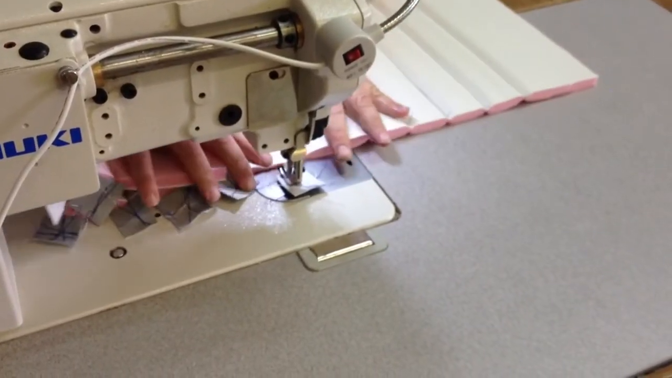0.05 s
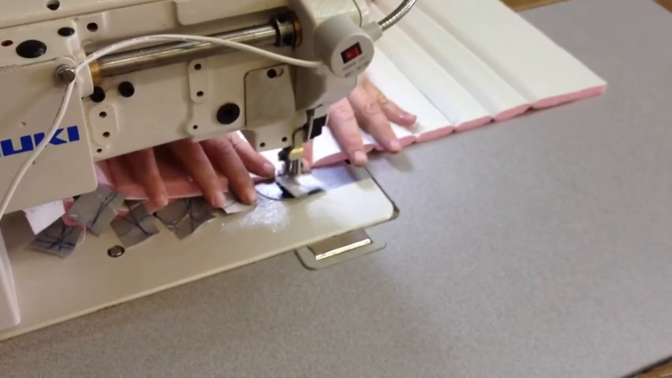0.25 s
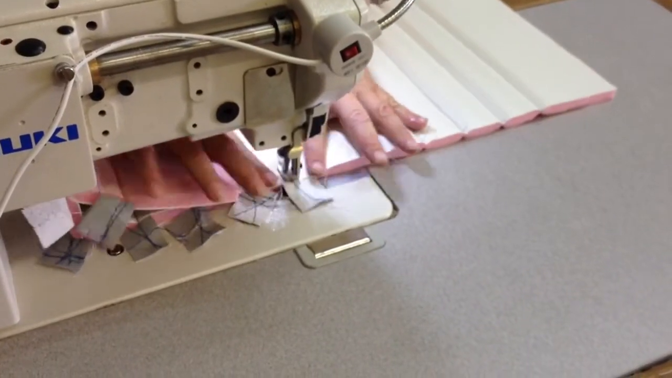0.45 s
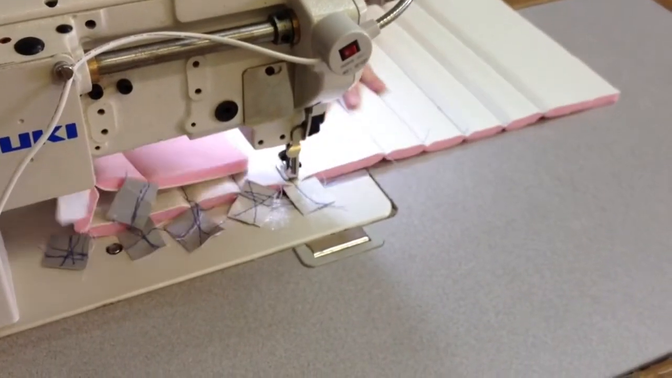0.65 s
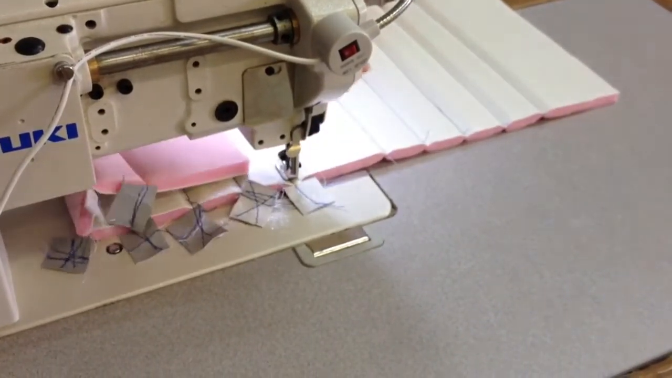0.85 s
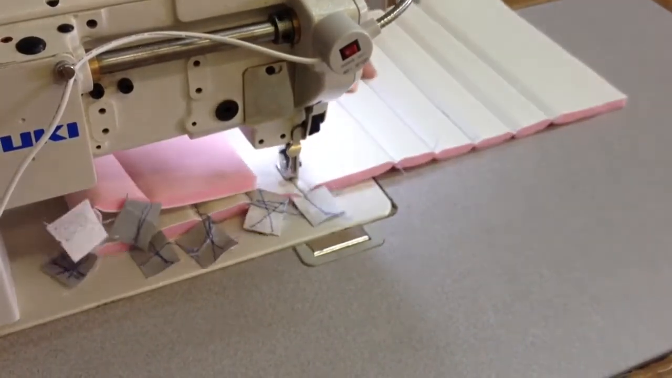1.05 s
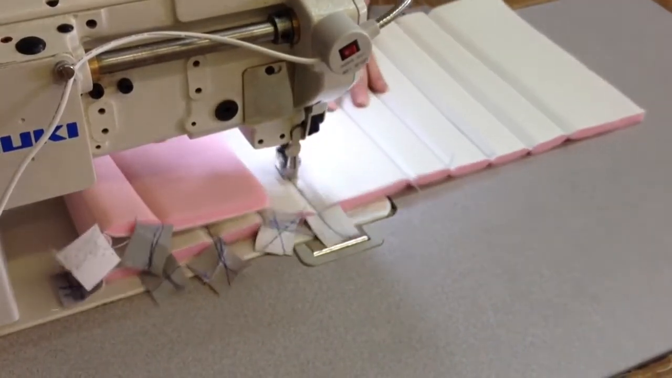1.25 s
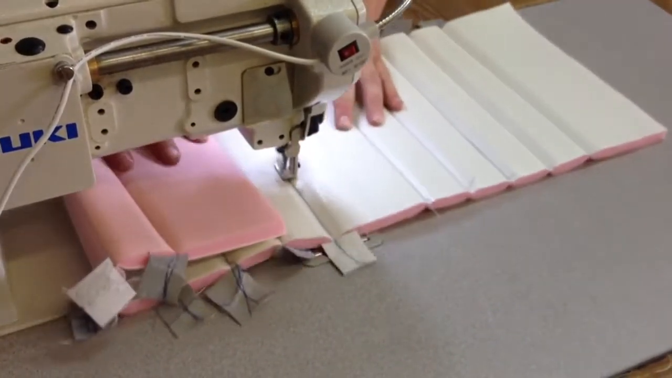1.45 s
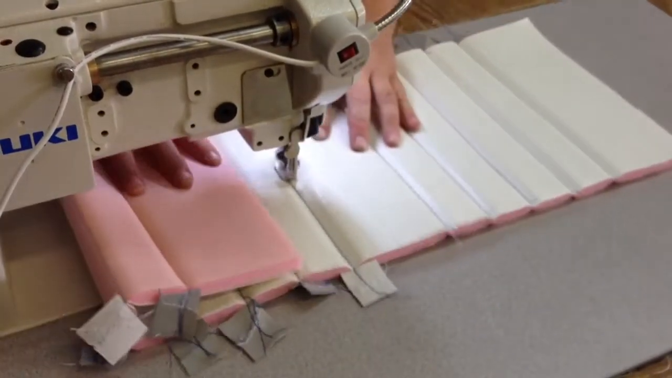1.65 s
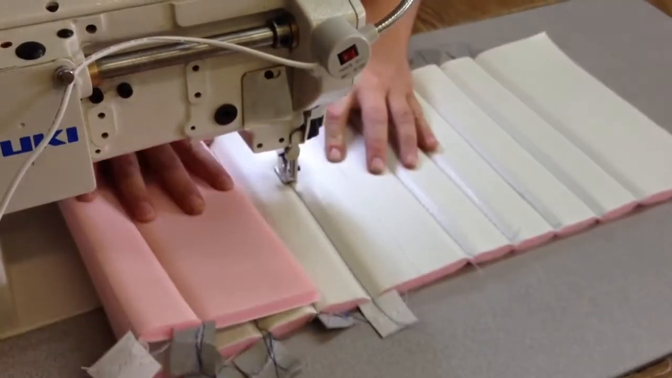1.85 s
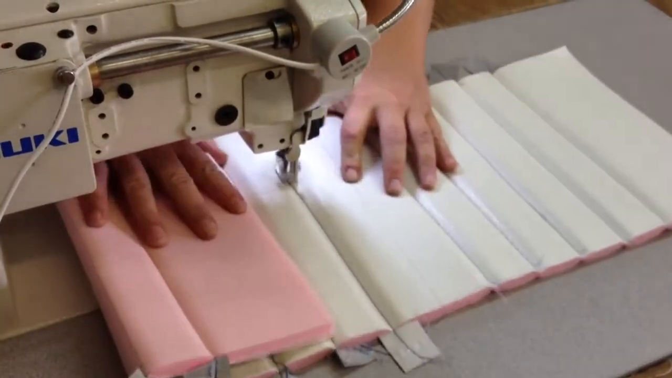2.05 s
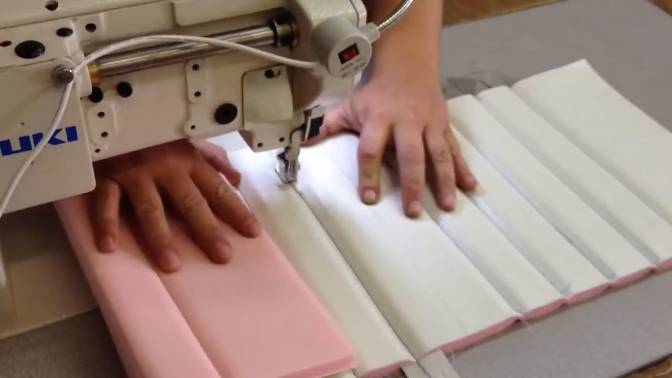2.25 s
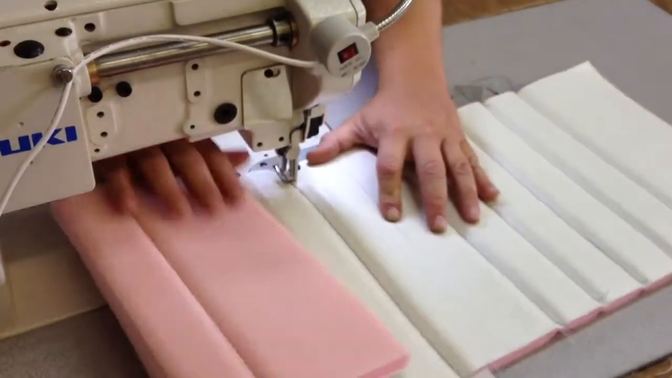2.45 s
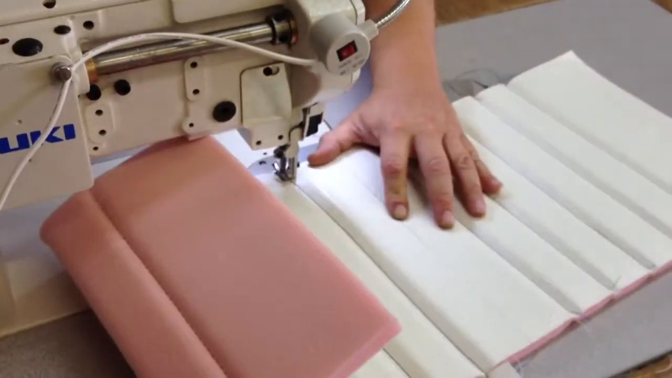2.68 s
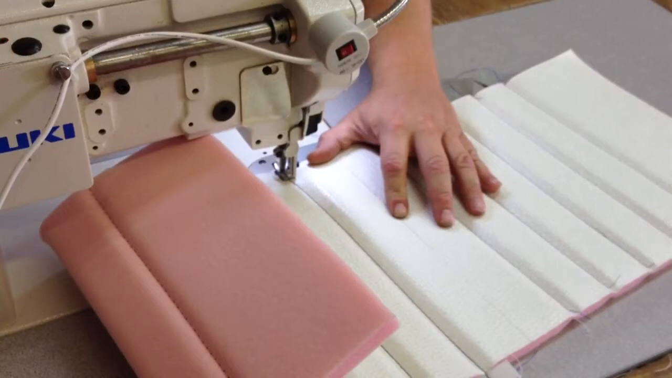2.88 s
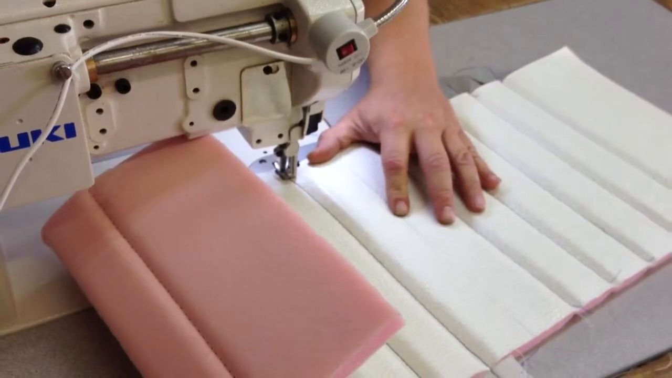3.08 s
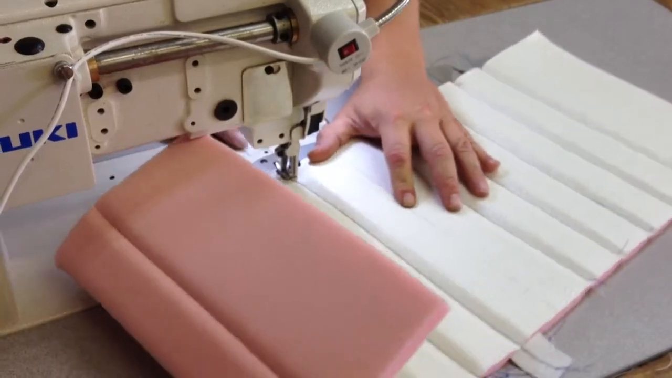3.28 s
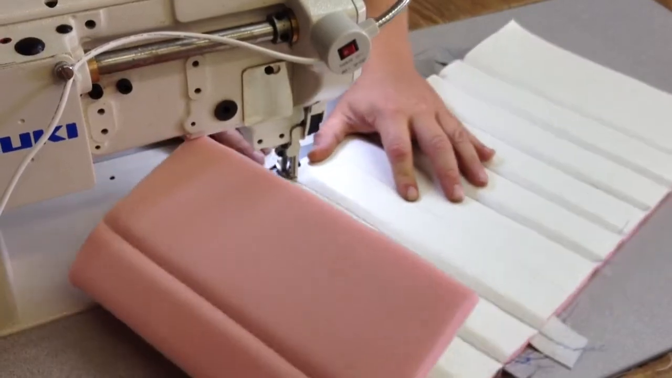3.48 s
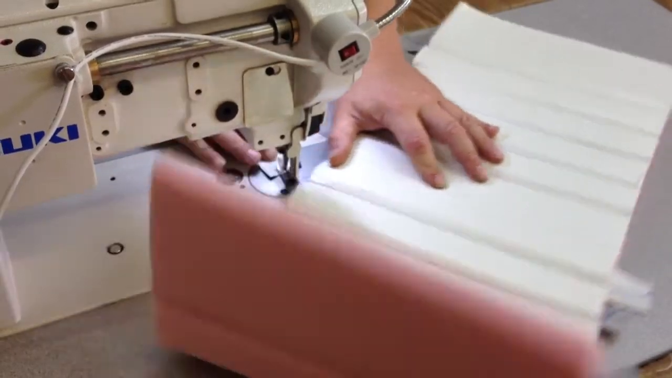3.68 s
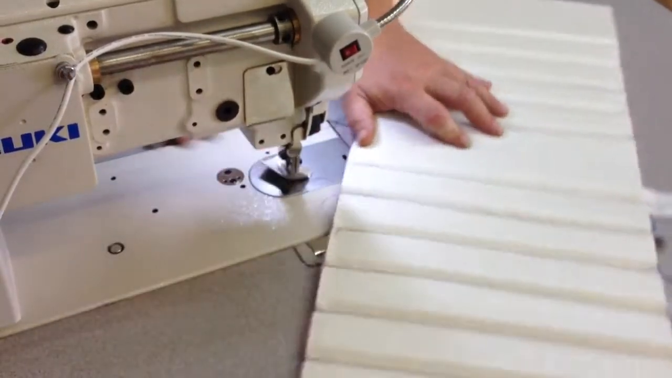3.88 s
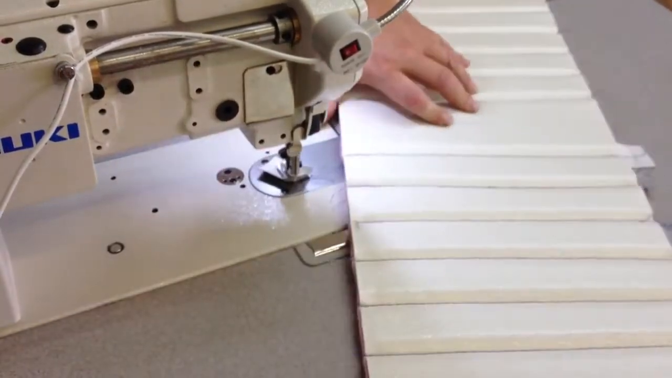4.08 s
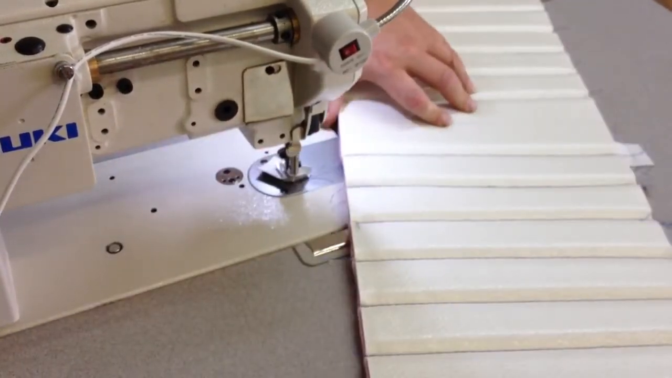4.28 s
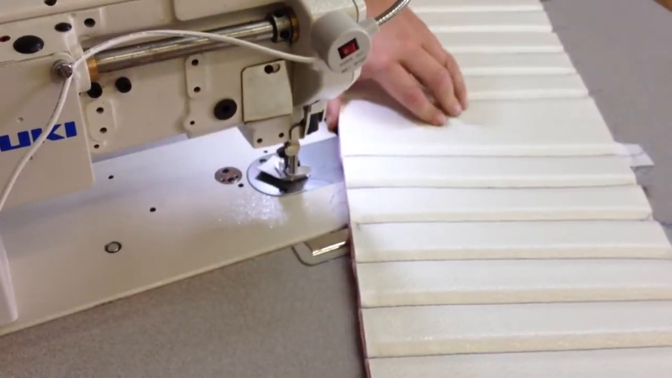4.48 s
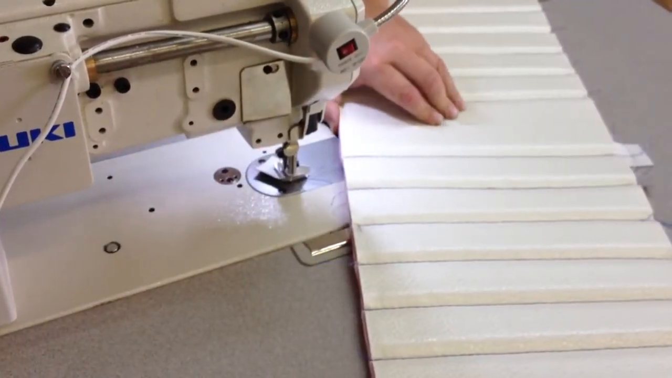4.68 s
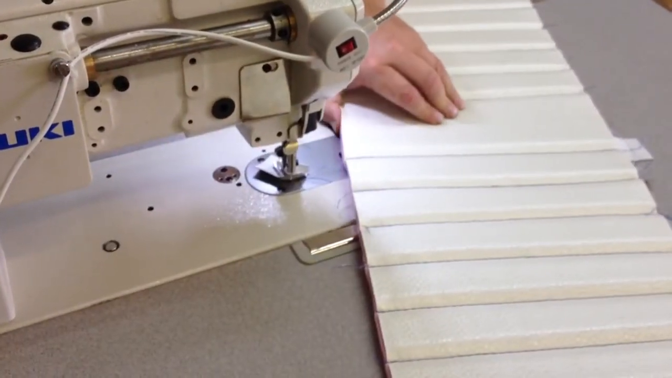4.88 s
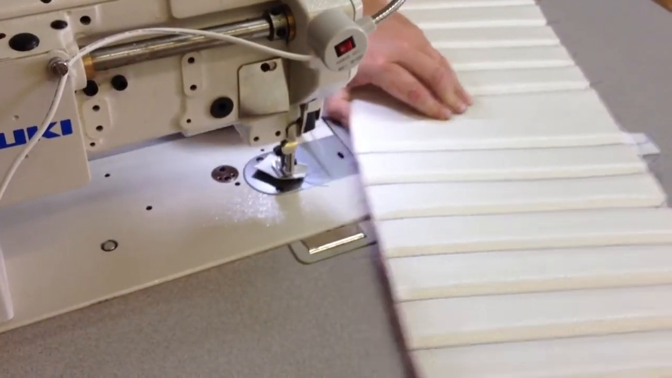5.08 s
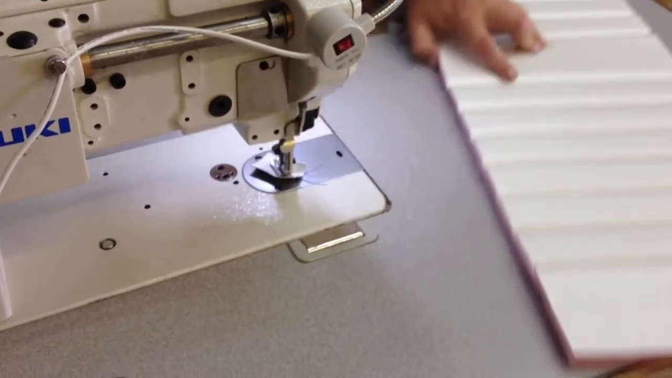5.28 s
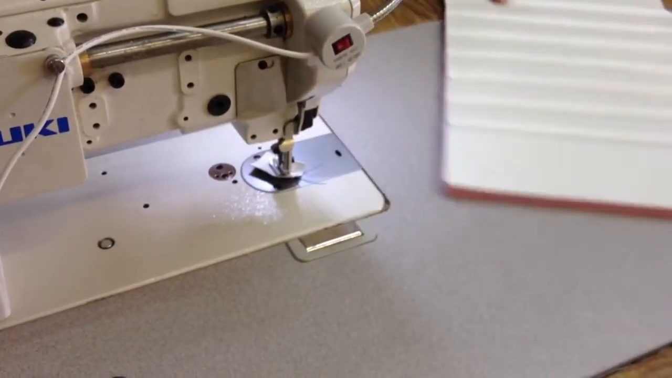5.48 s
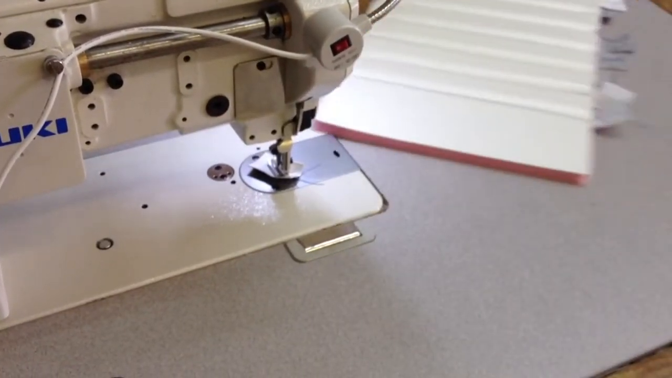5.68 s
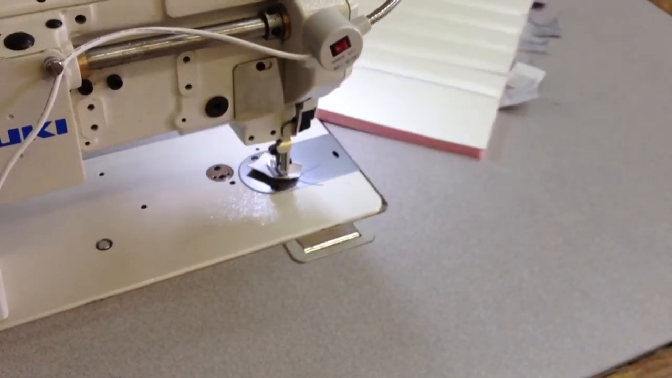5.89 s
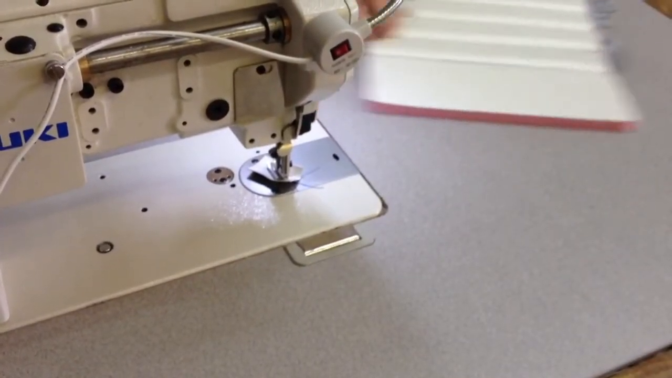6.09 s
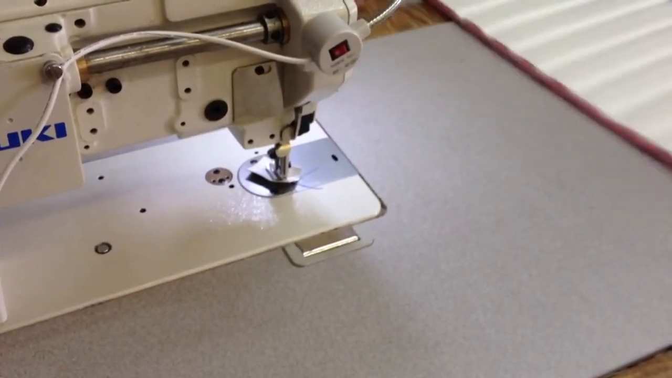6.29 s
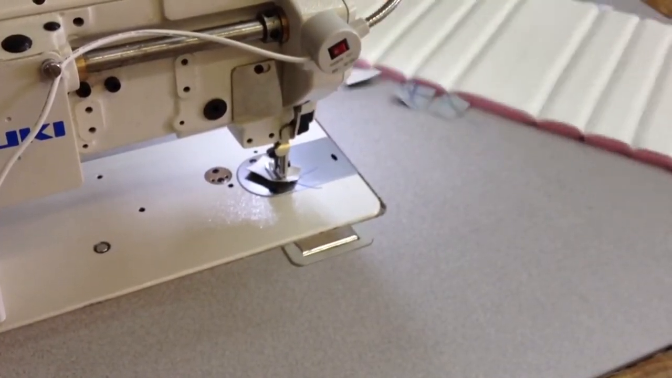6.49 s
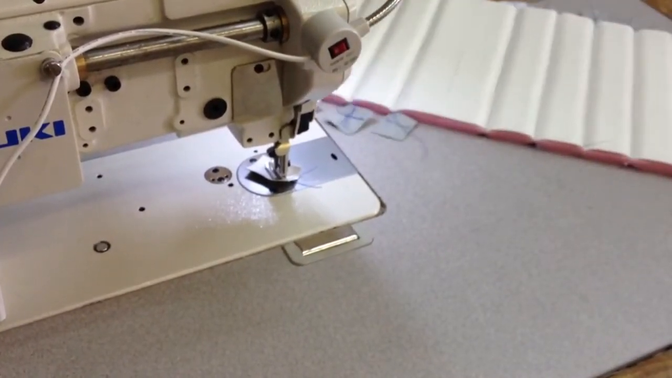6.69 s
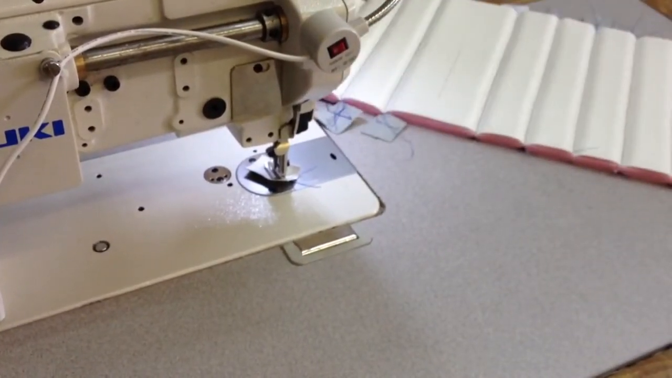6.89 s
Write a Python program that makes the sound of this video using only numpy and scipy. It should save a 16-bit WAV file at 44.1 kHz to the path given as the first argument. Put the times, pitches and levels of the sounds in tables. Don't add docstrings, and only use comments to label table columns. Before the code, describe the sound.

A heavy sewing machine heard from close by, with slight room echo: a brief rattling burst, then about a second and a half of rapid even clatter and throbbing low drone, braking quickly. Padded panels brush the table, levers click, and a last short burst rattles. Afterwards only soft air hum, small ticks, a thread snip, a hard tap and light foam rubbing remain.

```python
import sys
import numpy as np
from scipy import signal
from scipy.fft import rfft, irfft, next_fast_len
from scipy.io import wavfile
from scipy.ndimage import uniform_filter1d

SR = 44100
rng = np.random.default_rng(int(sys.argv[2]) if len(sys.argv) > 2 else 0)


def gain_from_decibels(decibels):
    exponent = np.asarray(decibels, float) / 20
    return 10 ** exponent


def materialize(psi):
    bounded = np.clip(np.atleast_2d(psi).T, -1, 1)
    quanta = np.round(bounded * 32767).astype(np.int16)
    wavfile.write(sys.argv[1], SR, quanta)


N = 306054
TIME_S = np.arange(N) / SR
FEED_ANGLE = 0.525
CRUISE_SPEED = 27.05


def level_curve(tables):
    curve = 0
    for table in tables:
        s, db = np.transpose(table)
        curve = curve + gain_from_decibels(np.interp(TIME_S, s, db, left=-150, right=-150))
    return curve


def coloured(spectrum):
    hz, db = np.transpose(spectrum)
    size = next_fast_len(N)
    grid = np.maximum(np.arange(size // 2 + 1) * SR / size, 1)
    gain = gain_from_decibels(np.interp(np.log(grid), np.log(hz), db))
    noise = irfft(rfft(rng.standard_normal(size)) * gain, size)[:N]
    return noise / np.sqrt(np.mean(noise ** 2) + 1e-20)


def drift(rate):
    knots = rng.standard_normal(int(N / SR * 100) + 2)
    return np.interp(TIME_S * rate, np.arange(len(knots)), knots)


def ring(clicks, hz, t60):
    r, w = gain_from_decibels(-60 / (t60 * SR)), 2 * np.pi * hz / SR
    return signal.lfilter([0, np.sin(w)], [1, -2 * r * np.cos(w), r * r], clicks + 1e-18)


def room(x):
    t60_s, tail_db = 0.4, -10
    t = np.arange(SR // 2) / SR
    tail = rng.standard_normal(len(t)) * gain_from_decibels(-60 * t / t60_s) * np.minimum(t / .006, 1)
    tail = signal.lfilter([.5], [1, -.45], tail)
    tail /= np.sqrt(np.sum(tail ** 2))
    return x + gain_from_decibels(tail_db) * signal.fftconvolve(x, tail)[:N]


def radiated(x):
    return signal.sosfilt(signal.butter(6, 125, "high", fs=SR, output="sos"), x)


# (time [s], level [dB])
AIR_LEVEL = [(0, -46), (.2, -45), (2.9, -46), (4.8, -46.5), (5.3, -45.5), (7, -46)]
# (frequency [Hz], level [dB per Hz])
AIR_COLOUR = [(20, -64), (50, -41), (90, -22.5), (125, -8), (200, -3.5), (265, -6), (400, -3), (620, -13.5),
              (1020, -10), (2500, -16), (3500, -27), (4800, -24), (10000, -35), (15500, -40.5)]


def workshop_air():
    return level_curve([AIR_LEVEL]) * gain_from_decibels(2.5) * coloured(AIR_COLOUR)


# (frequency [Hz], rms level [dB])
HUM_TONES = [(129.2, -55), (263.8, -49.5), (323.0, -55), (360.7, -57)]


def hum():
    out = np.zeros(N)
    for hz, db in HUM_TONES:
        level = gain_from_decibels(db + 1.5 + 2.0 * drift(2.81))
        out += level * np.sin(2 * np.pi * hz * TIME_S + 2.0 * drift(5))
    return out


# (time of hardest push [s], level [dB], rise [s], fade [s])
FOAM_PUSHES = [(.17, -39.5, .04, 0.18), (.65, -42, 0.19, 0.26), (.85, -58, 0.039, .1),
               (3.12, -46.5, 0.19, 0.32), (3.51, -47.5, 0.089, 0.82), (4.0, -63, .1, .2),
               (4.75, -59, 0.2, 0.89), (5.13, -53, 0.16, 1), (5.62, -46, 0.071, .1),
               (6.1, -59.5, 0.27, 0.89), (6.4, -48.5, .6, 0.57)]
# (frequency [Hz], level [dB per Hz])
FOAM_COLOUR = [(1470, -0.5), (2500, 4), (3720, -15), (4750, 0.5), (5200, -8), (6200, -3), (10300, -13),
               (12800, -10), (15500, -21)]


def foam_sliding():
    push = np.zeros(N)
    for s, db, rise, fade in FOAM_PUSHES:
        distance = np.maximum((s - TIME_S) / rise, (TIME_S - s) / fade)
        push += gain_from_decibels(db - 20 * distance)
    return radiated(push * gain_from_decibels(0.66 * drift(32)) * coloured(FOAM_COLOUR))


# (time [s], peak level [dB], frequency [Hz], t60 [s])
TABLE_KNOCKS = [(0.155, -24, 214, 0.14), (0.283, -8.5, 212, 0.23), (0.321, -16, 242, 0.23),
                (0.35, -20, 183, 0.14), (0.998, -14, 208, .1), (1.029, -7, 363, 0.09),
                (0.893, -12, 252, 0.032), (0.961, -12, 232, 0.086), (3.656, -14.5, 240, 0.073),
                (3.705, -9, 229, 0.11), (3.742, -15, 220.5, 0.12), (3.768, -8, 231, 0.13),
                (4.177, -24, 218, 0.095), (4.978, -18, 187, 0.027), (5.593, -19, 256, 0.048),
                (5.949, -28, 260.5, 0.5)]


def knocks():
    out = np.zeros(N)
    click = np.zeros(SR // 4)
    click[0] = 1
    blow = signal.lfilter([.02], [1, -.98], click) * 0.7
    for s, db, hz, t60 in TABLE_KNOCKS:
        i = round(s * SR)
        out[i:i + len(blow)] += gain_from_decibels(db) * ring(blow, hz, t60)
    return out


# (time [s], peak level [dB], centre frequency [Hz], t60 [s])
LEVER_TICKS = [(0.167, -32, 5070, 0.073), (.226, -37, 8040, .021), (.245, -31, 7200, .021),
               (.298, -32, 6500, 0.024), (0.331, -20, 6500, .016), (.843, -33, 6060, .031),
               (.968, -15.5, 1990, 0.027), (.989, -22, 5500, .016), (3.456, -45, 2000, .021),
               (3.498, -34.5, 9900, 0.16), (3.618, -36, 5500, .021), (3.692, -23.5, 6300, 0.02),
               (3.706, -22, 2400, 0.026), (3.979, -28, 6960, 0.018), (4.181, -26, 1730, 0.026),
               (4.182, -40, 6000, .021), (4.204, -36, 2050, 0.019)]
# (time [s], peak level [dB], centre frequency [Hz], t60 [s])
HANDLING_TICKS = [(5.006, -38, 11000, .041), (5.0733, -26, 7900, 0.013), (5.076, -26, 7500, 0.027),
                  (5.5785, -30, 2500, .016), (5.5822, -15.5, 4100, 0.02), (5.582, -20.5, 2050, 0.024),
                  (5.594, -12, 4830, 0.0076), (5.593, -24.5, 5960, 0.081), (5.598, -18.5, 1500, 0.049),
                  (5.612, -27, 1200, .14), (5.692, -36, 7500, .015), (5.693, -29, 2300, .021),
                  (5.761, -34, 3160, 0.015), (5.943, -32, 1300, 0.15), (6.289, -31.5, 1300, 0.22),
                  (6.3126, -33, 1680, 0.17), (6.451, -37, 5500, .021), (6.63, -33, 5440, .021)]


def ticks():
    out = np.zeros(N)
    t = np.arange(SR // 8) / SR
    for s, db, hz, t60 in LEVER_TICKS + HANDLING_TICKS:
        i = round(s * SR)
        edges = [hz / 1.6, min(hz * 1.6, SR / 2.5)]
        band = signal.butter(2, edges, "band", fs=SR, output="sos")
        burst = signal.sosfilt(band, rng.standard_normal(len(t)) * gain_from_decibels(-60 * t / t60))
        out[i:i + len(t)] += gain_from_decibels(db - 2.0) * burst / np.abs(burst).max()
    return out


# (time [s], length [s], frequency [Hz], level [dB])
PEDAL_SQUEAKS = [
    (.18, .06, 1390, -42),
    (3.6, .08, 1600, -47),
]


def pedal():
    out = np.zeros(N)
    for s, length, hz, db in PEDAL_SQUEAKS:
        swell = np.sin(np.pi * np.clip((TIME_S - s) / length, 0, 1))
        out += gain_from_decibels(db) * swell * np.sin(2 * np.pi * hz * TIME_S)
    return out


# (time [s], level below full [dB])
DRIVE_EFFORT = [
    [(0.23, -26), (0.274, -17.5), (0.3, -11), (0.36, -3), (0.434, 0), (0.47, -4.5), (0.566, -19),
     (0.622, -34), (0.67, -25)],
    [(0.81, -30), (0.9, -20), (0.96, -13.5), (1.04, -2.5), (1.2, 0.5), (2.4, 1), (2.49, 2.5), (2.57, -11),
     (2.77, -35.5)],
    [(3.61, -28), (3.68, -24), (3.714, -5), (3.73, -9), (3.776, 1), (3.854, -0.3), (3.9, -5), (3.976, -18),
     (4.09, -33)],
]


def drive_effort():
    return level_curve(DRIVE_EFFORT)


# (time [s], speed [turns per s])
SHAFT_SPEED = [(1.0478, 21.99), (1.11, 26.27), (1.19, 28.02), (1.33, 28.92), (1.44, 28.65), (1.55, 27.08),
               (1.72, 26.8), (1.95, 27.05), (2.48, 27.15)]
# (speed [turns per s], needle level [dB], feed level [dB])
CLACK_LEVELS = [(22, -18, -10), (27.34, -12, -17), (28.5, -13.5, -5.5)]


def seam_clacks():
    stitches = 39
    s, speed = np.transpose(SHAFT_SPEED)
    t = np.arange(s[0], s[-1] + .02, 1 / SR)
    speed = np.interp(t, s, speed)
    angle = np.append(np.arange(stitches)[:, None] + [0, FEED_ANGLE], stitches)
    times = np.interp(angle, np.cumsum(speed) / SR, t)
    now = np.interp(times, t, speed)
    law_speed, needle_db, feed_db = np.transpose(CLACK_LEVELS)
    needle = np.interp(now, law_speed, needle_db)
    feed = np.interp(now, law_speed, feed_db)
    return list(zip(times, np.where(angle % 1 == 0, needle, feed)))


# (time [s], peak level [dB])
FIRST_CLACKS = [(0.2818, -22.5), (0.3177, -19.5), (0.3478, -17.5), (0.3703, -18.5), (0.3933, -13.5),
                (0.4128, -16), (0.4329, -11), (0.4558, -12.5), (0.4884, -32), (0.526, -30)]
# (time [s], peak level [dB])
STARTING_CLACKS = [(0.9058, -25), (0.9383, -29), (0.967, -24), (0.998, -20.5), (1.0255, -17.5)]
# (time [s], peak level [dB])
BRAKING_CLACKS = [(2.502, -8.5), (2.53, -17)]
# (time [s], peak level [dB])
LAST_CLACKS = [(3.7428, -12), (3.7679, -12), (3.794, -6), (3.8145, -10), (3.835, -7.5), (3.8569, -8),
               (3.888, -23)]


def shaft():
    times, turns, levels = [], [], []
    seam = STARTING_CLACKS + seam_clacks() + BRAKING_CLACKS
    for k, burst in enumerate([FIRST_CLACKS, seam, LAST_CLACKS]):
        s, db = np.transpose(burst)
        half = np.arange(len(s))
        angle = np.where(half % 2 == 0, half // 2 - 1 + FEED_ANGLE, half // 2)
        angle = angle + 100 * k
        times += [s[0] - .055, *s, s[-1] + 0.17]
        turns += [angle[0] - .42, *angle, angle[-1] + 1.35]
        levels += [db[0] - 50, *db, db[-1] - 42]
    return np.array(times), np.array(turns), np.array(levels)


# (frequency [Hz], level [dB per Hz])
SHAKE_COLOUR = [(20, -60), (90, -44), (130, -2), (200, 3.5), (350, -1), (600, -13.5), (1200, -15),
                (1700, -19), (2500, -21.5), (3300, -51), (5000, -55)]


def shaking(bed, tonal):
    return gain_from_decibels(-17 + 13 * (1 - tonal)) * bed * coloured(SHAKE_COLOUR)


# (frequency [Hz], level [dB per Hz])
RATTLE_COLOUR = [(2800, -34), (3300, 0), (3800, -6), (4350, 2.5), (5500, 2.5), (6600, 2.5), (7400, -1),
                 (8500, 0), (10400, -8), (12500, -0.5), (14400, -11.5), (15500, 0)]


def rattling(effort, turn):
    swell_db = 0.49 * np.cos(4 * np.pi * (turn - .09))
    level = gain_from_decibels(-24) * effort ** 0.91
    return gain_from_decibels(-5.5 + swell_db + 0.5 * drift(56)) * level * coloured(RATTLE_COLOUR)


# (frequency [Hz], level [dB per Hz])
GRIND_COLOUR = [(400, -43), (600, 9.5), (850, 7), (1300, 4), (1700, 10), (2400, -7.5), (3000, -4),
                (3500, -40)]


def grinding(arm):
    return gain_from_decibels(-17) * arm * coloured(GRIND_COLOUR)


def strike(modes, at, strength):
    out = np.zeros(N)
    contacts = at.shape[1]
    for hz, db, t60 in modes:
        grip = rng.choice([-1, 1], contacts) * gain_from_decibels(rng.normal(0, 2.5, contacts))
        change_db = 2.2 * rng.standard_normal(at.shape)
        clicks = np.zeros(N)
        np.add.at(clicks, at, strength * grip * gain_from_decibels(db + change_db))
        out += ring(clicks, hz, t60)
    return out


# (angle [turns], delay [ms], arm level [dB], steel level [dB], looseness [ms])
TURN_CONTACTS = [(0., .4, -1.5, -1.5, .02), (0., 1.3, -6, -5, .1), (0., 2.8, -1.5, -9, .02),
                 (0., 4.2, -5, -5, .05), (.19, 0, -8, -20, .02), (.24, 0, -5, -18, .02),
                 (.31, 0, -11, -18, .03), (.36, 0, -8, -19, .02), (.42, 0, -9, -22, .02),
                 (.47, 0, -14, -19, .05), (FEED_ANGLE, .5, -4, -1.5, .08), (FEED_ANGLE, 1.6, -6, -7, .1),
                 (FEED_ANGLE, 2.8, -4, -15, .03), (.67, 0, -8, -18, .02), (.75, 0, -11, -21, .02),
                 (.83, 0, -9, -21, .02), (.92, 0, -12, -22, .02)]
# (frequency [Hz], level [dB], t60 [s])
ARM_MODES = [(685, -26, 0.025), (775, -13.5, 0.028), (1037, -12.5, 0.021), (1300, -10.5, 0.025),
             (1530, -0.5, 0.0052), (1710, -8, 0.033), (1790, -9, 0.03), (2150, 0.5, 0.01),
             (2300, -4, 0.011), (2390, -1, 0.0087), (2784, -2, 0.0097), (3580, -13, 0.006)]
# (frequency [Hz], level [dB], t60 [s])
STEEL_MODES = [(2440, 3, 0.0076), (4430, -5.5, 0.021), (4780, -0.5, 0.011), (5200, -0.5, 0.006),
               (5660, 4.5, 0.0065), (6300, -3, 0.0049), (6950, 3, 0.0053), (7500, -0.5, 0.0061),
               (9600, -9, 0.0048), (9750, -13, 0.0021), (12200, -25, 0.0036), (12400, -1, 0.0044),
               (14100, -16, .003)]


def contacts(times, turns, levels, effort, arm):
    angle, delay_ms, arm_db, steel_db, loose_ms = np.transpose(TURN_CONTACTS)
    whole = np.unique(np.concatenate([np.floor(turns), np.floor(turns) - 1]))
    s = np.interp(whole[:, None] + angle, turns, times)
    s = s + (delay_ms + loose_ms * rng.standard_normal(s.shape)) / 1000
    at = np.clip(np.round(s * SR).astype(int), 0, N - 1)
    running = effort[at] > 1e-6
    clack_db = np.interp(s, times, levels)
    casting = strike(ARM_MODES, at, arm[at] * gain_from_decibels(arm_db - 3.5))
    steel = strike(STEEL_MODES, at, running * gain_from_decibels(clack_db + steel_db - 8.5))
    return room(casting + steel)


# (frequency [Hz], level [dB])
TABLE_ANSWER = [(100, -24), (135, -6), (146, -15), (165, -5), (205, 3.), (243, 0.), (252, 1.), (260, -8),
                (292, -15), (335, -3), (348, -13), (400, 2.), (462, 0.), (490, -12)]


def table_db(hz):
    table_hz, db = np.transpose(TABLE_ANSWER)
    return np.interp(np.log(hz + 1), np.log(table_hz), db)


# (multiple of shaft speed, level [dB])
BED_TONES = [(1, -46), (2, -45), (3, -44), (4, -27), (5, -14), (6, -18), (7, 1), (8, -21), (9, 0), (10, -7),
             (11, -19), (12, -10), (13, -23), (14, -18), (15, -11), (16, -18), (17, -13), (18, -26),
             (19, -20), (20, -23), (21, -23), (22, -27)]


def bed_orders(turn, speed):
    crest_turns, crest_rad, crest_spread = .783, -2.2, .012
    slip_rad, pull_s = .9, .07
    pull = uniform_filter1d(np.gradient(speed) * SR, size=3000)
    slip = np.clip(speed - CRUISE_SPEED, -1, 2) + pull_s * np.clip(pull, 0, 30)
    out = np.zeros(N)
    for k, db in BED_TONES:
        answer_db = table_db(k * speed) - table_db(k * CRUISE_SPEED)
        level = gain_from_decibels(db + 1.5 * drift(9.02) + answer_db)
        phase = 2 * np.pi * k * (turn - crest_turns) + crest_rad - crest_spread * k * k
        phase = phase + slip_rad * rng.uniform(-1.06, 1) * slip
        out += level * np.cos(phase)
    return out


def machine():
    times, turns, levels = shaft()
    effort = drive_effort()
    bed = gain_from_decibels(-18) * effort ** 0.83
    arm = gain_from_decibels(-16) * effort ** 1.09
    turn = np.interp(TIME_S, times, turns)
    speed = np.gradient(turn) * SR
    speed = uniform_filter1d(speed * (speed < 40), size=1600)
    tonal = np.interp(speed, [16.3, 25.9], [0, 1])
    shake = shaking(bed, tonal)
    loose = rattling(effort, turn) + grinding(arm)
    metal = contacts(times, turns, levels, effort, arm)
    orders = gain_from_decibels(-5) * tonal * bed * bed_orders(turn, speed)
    return orders + shake + radiated(loose + metal)


def scene():
    background = workshop_air() + hum() + foam_sliding()
    small_events = radiated(room(knocks() + ticks()))
    return (background + small_events + pedal() + machine())[None]


def top_cut(x):
    return signal.sosfilt(signal.butter(12, 15800, fs=SR, output="sos"), x)


def record(dry):
    low_pass = signal.cheby2(14, 70, 15950, fs=SR, output="sos")
    mix = signal.sosfilt(low_pass, dry)
    return top_cut(mix)


dry = scene()
out = record(dry)
materialize(out)
```